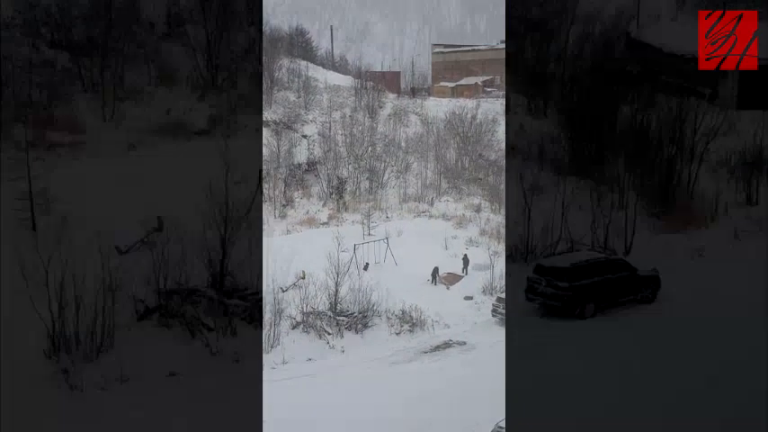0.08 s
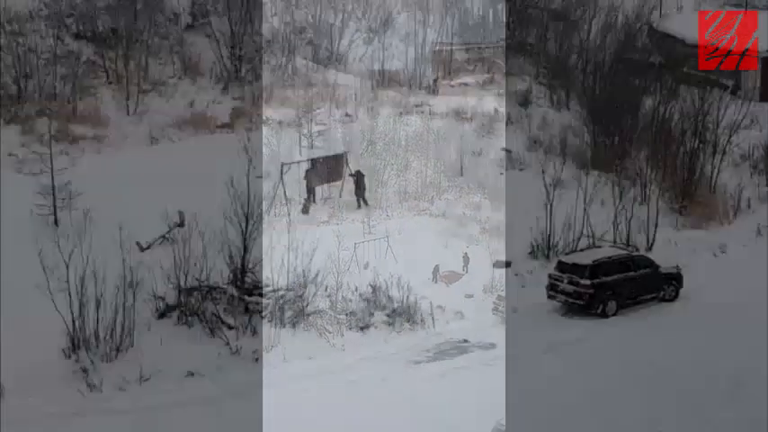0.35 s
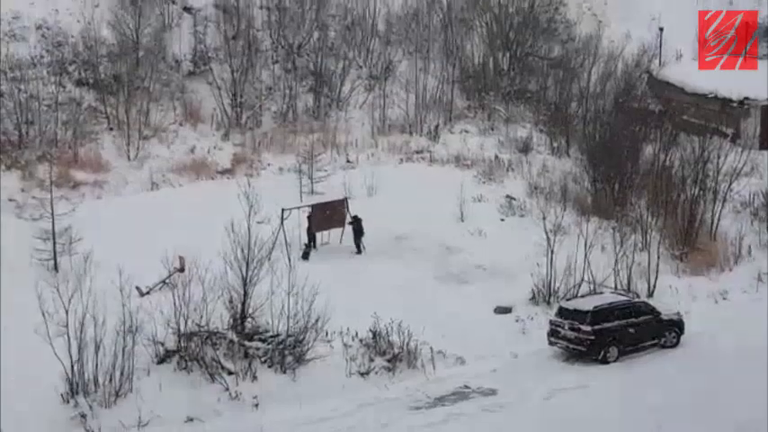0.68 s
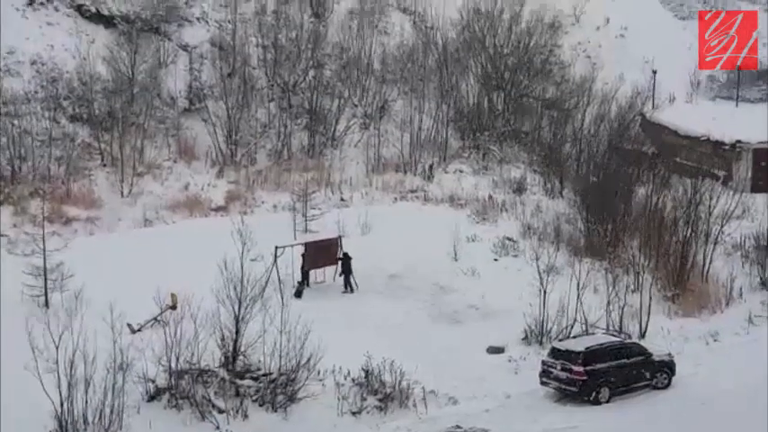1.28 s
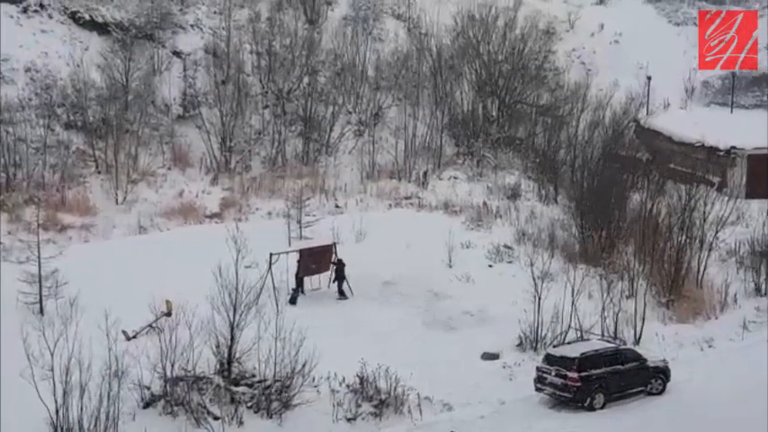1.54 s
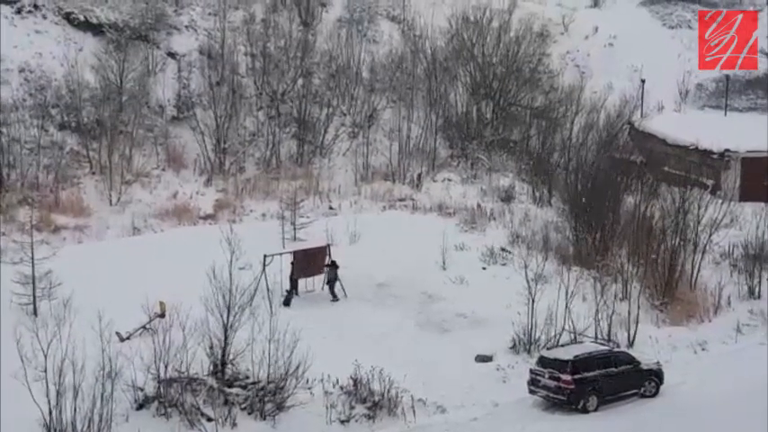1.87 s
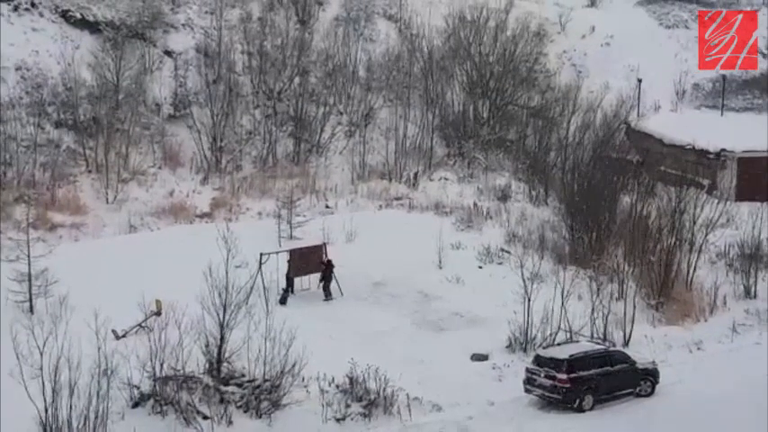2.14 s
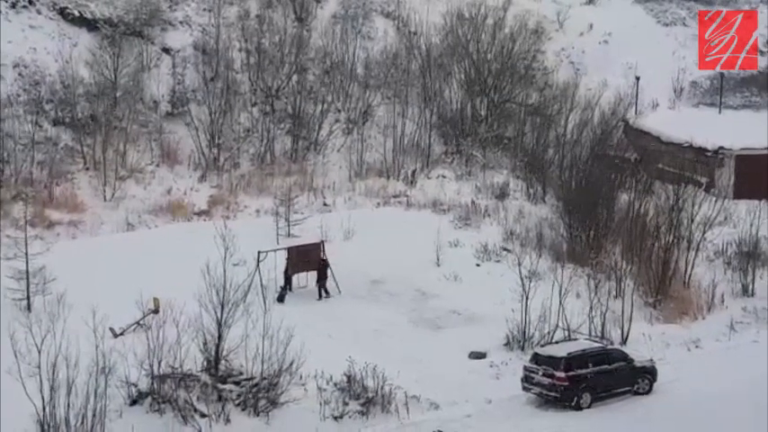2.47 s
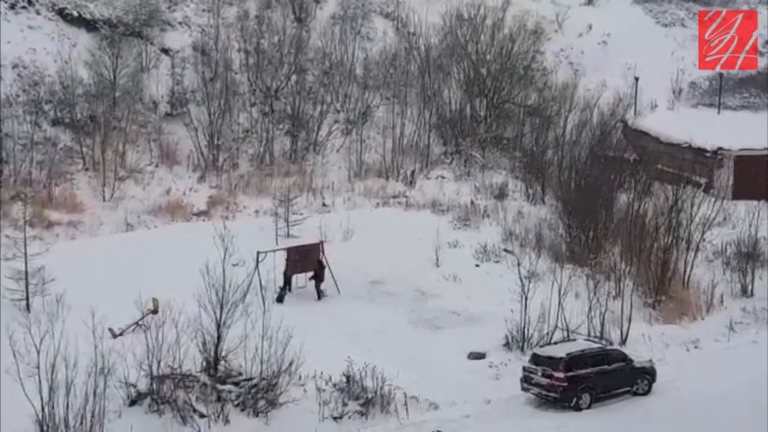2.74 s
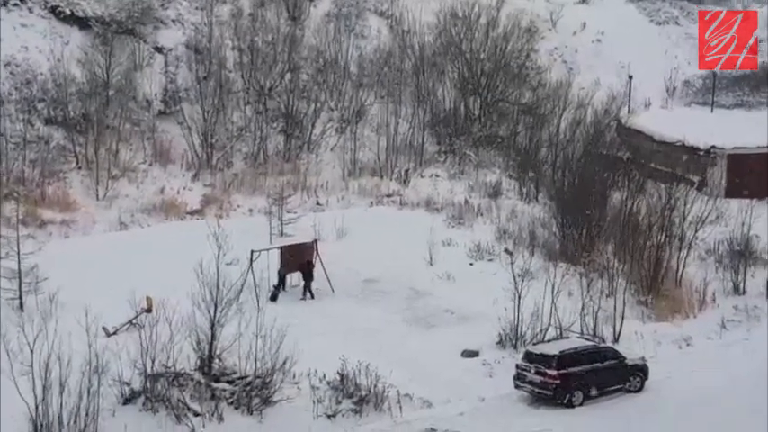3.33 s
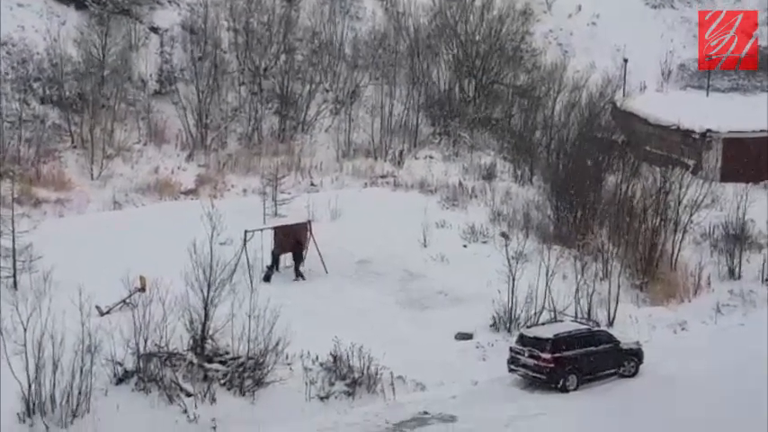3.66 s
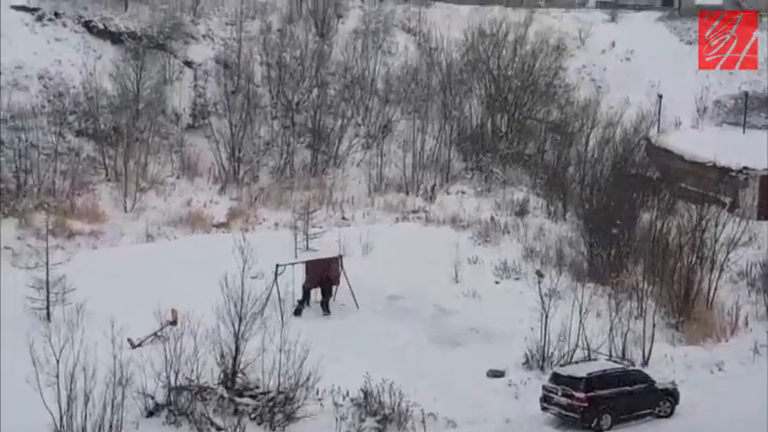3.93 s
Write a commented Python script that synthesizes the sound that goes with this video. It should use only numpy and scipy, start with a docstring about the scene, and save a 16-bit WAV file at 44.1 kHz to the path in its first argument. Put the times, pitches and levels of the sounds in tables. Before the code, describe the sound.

Two people beat a hanging carpet in a snowy yard, heard from a distance. Wind briefly buffets the microphone, then dull, uneven thumps with a short echo grow louder. Small birds twitter faintly throughout.

```python
"""Two people beat a hanging carpet in a snowy yard, heard from a distance and from above.
Each blow is an impulse response: one heavily damped swing radiates a dull pulse with a short crack,
followed by a close reflection and a tail scattered by trees and walls. Faint tones ring far off.
Small birds twitter throughout in frequency-modulated notes. Turbulent wind buffets the microphone
at first, then settles, leaving the broadband noise of the air."""
import sys
import numpy as np
from scipy import signal
from scipy.fft import rfft, irfft
from scipy.io import wavfile

SR = 44100
rng = np.random.default_rng(int(sys.argv[2]) if len(sys.argv) > 2 else 0)


def wav_record(signal):
    """Record a signal, one row per channel, as 16-bit PCM in the file named by sys.argv[1]."""
    frames = np.transpose(np.atleast_2d(signal))
    bounded = np.clip(frames, -1, 1)
    # unit amplitude maps onto the largest positive 16-bit level
    quanta = np.round(bounded * 32767).astype(np.int16)
    wavfile.write(sys.argv[1], SR, quanta)


N = 176400
T = np.arange(N) / SR

# blows on the carpet: (time [s], level [dB], thump pitch [Hz], thump low-pass [Hz], first touch [dB],
# crack [dB], crack low-pass [Hz], tail [dB], reflection delay [s], reflection [dB])
BLOWS = [(0.8873, -31.5, 284, 810, -35, 1, 10600, 1.5, .0034, -2),
         (0.9643, -33.5, 263, 660, -7, -6.5, 2930, -1.5, 0.004, -8),
         (1.3142, -31, 430, 470, -24, 1, 5560, 4, 0.0026, -5),
         (1.6750, -44, 372, 1200, -8, 3.5, 2900, 2.5, 0.004, -2),
         (1.7092, -31, 290, 726, -4, -4, 2820, -4.5, .0041, -21),
         (1.746, -43, 420, 600, -20, -1, 2500, -2, 0.00423, -4),
         (2.1472, -29.5, 305, 1100, -6.5, -8, 2800, 0.5, 0.0041, -8),
         (2.451, -32, 293, 445, -16, -23, 2000, 1, 0.0033, -6),
         (2.6327, -21.5, 444, 1300, -20, -13, 6300, 2.5, .0045, -31),
         (3.0437, -22.5, 480, 1740, -27, -12.5, 3480, 1.5, 0.00404, -5),
         (3.3155, -32.5, 288, 490, -8.5, -5.5, 3000, -0.5, 0.0039, -9),
         (3.4638, -21, 352, 1300, -15, -7.5, 3260, -1, .0038, -9.5),
         (3.9065, -12.5, 435, 1980, -29, -5.5, 2630, 0, 0.0043, -10)]
BLOW_PAN_DB, TOUCH_LEAD_S = 2.4, .0044
PUSH_S, PUSH_DB = .00079, -21  # air pushed ahead of the beater
def carpet():
    """Multipath propagation: each blow arrives directly, by one close reflection and by scattering."""
    out, paths = np.zeros((2, N)), yard_paths()
    for s, db, thump_hz, edge_hz, touch_db, crack_db, top_hz, tail_db, delay, reflection_db in BLOWS:
        pulse = from_db(db) * blow(thump_hz, edge_hz, crack_db, top_hz)
        add(out, s - PUSH_S, from_db(db + PUSH_DB) * np.hanning(int(PUSH_S * SR)))
        add(out, s - TOUCH_LEAD_S, from_db(touch_db) * pulse)
        add(out, s, pulse)
        add(out, s + delay, from_db(reflection_db) * pulse)
        add(out, s, from_db(tail_db) * sum(scatter(pulse, envelope, field) for envelope, field in paths))
    return pan(BLOW_PAN_DB) * out


# resonances of the crack: (frequency [Hz], gain [dB], Q [-])
CRACK_PEAKS = [(5160, 8.5, 20), (8000, 15, 21), (9870, -21, 0.56), (12700, 16, 20)]
# peaks and dips of the path over the snow: (frequency [Hz], gain [dB], Q [-])
SNOW_PATH = [(129, 9, 2.86), (470, 3.5, 3.75), (722, -6, 9), (936, -22, 7.1), (1100, 3, 18.6),
             (1980, -10.5, 1.11), (2520, 2.5, 9.1)]
THUMP_Q, THUMP_LOW_HZ, CRACK_DECAY_S, CRACK_LOW_HZ = .82, 50, .0017, 1300
def blow(thump_hz, edge_hz, crack_db, top_hz):
    """Damped oscillator: the struck carpet swings once while the beater cracks on its pile."""
    t = T[:SR // 20]
    swing = signal.lfilter(*signal.iirpeak(thump_hz, THUMP_Q, fs=SR), -1. * (t == 0))
    swing = cut(cut(swing, edge_hz, "low"), THUMP_LOW_HZ, "high", order=1)
    hiss = coloured(rng.standard_normal(len(t)), CRACK_PEAKS)
    hiss = unit(cut(cut(hiss, CRACK_LOW_HZ, "high"), top_hz, "low", order=4))
    crack = from_db(crack_db) * hiss * np.exp(-t / CRACK_DECAY_S) / 2
    return coloured(swing / np.abs(swing).max() + crack, SNOW_PATH)


# spectrum of the scattered tail: (frequency [Hz], gain [dB])
TAIL_SPECTRUM = [(60, -8), (120, -3), (170, -5), (280, -0.5), (340, 1.5), (435, 1), (530, 0.5), (650, 3),
                 (800, 3), (1000, -2), (2000, 0.5), (5000, -3.5), (8000, -8), (14000, -2)]
# echoes from far walls and trees: (delay [s], spread [s], relative level [dB])
ECHOES = [(0.084, 0.013, -25.5), (0.132, 0.011, -13), (0.337, 0.022, -28.5)]
# slight ringing of the echoes: (frequency [Hz], gain [dB], Q [-])
ECHO_PEAKS = [(417, 5, 18), (630, 7, 6.7), (724, 3.5, 22)]
EARLY_DB, EARLY_T60_S, LATE_DB, LATE_T60_S = -5.5, .08, -6, .72
TAIL_SIDE_DB, TAIL_PATCHY_DB, TREBLE_FROM_HZ, TREBLE_LOSS_DB_PER_S = -10.5, 2, 965, 51
def yard_paths():
    """Reverberation: (envelope, noise field) pairs for the low tail, its briefer treble and echoes."""
    t = T[:SR]
    arrived = t > .0043  # onset of the scatter [s]
    early = energy(arrived * from_db(-60 * t / EARLY_T60_S), EARLY_DB)
    late = energy(arrived * from_db(-60 * t / LATE_T60_S), LATE_DB)
    tail = np.hypot(early, late)
    echoes = sum(energy(np.exp(-((t - delay) / spread) ** 2 / 2), db) for delay, spread, db in ECHOES)
    rms_gain = np.sqrt(np.mean(at_hz(TAIL_SPECTRUM, np.arange(SR // 2)) ** 2))
    field = noise(TAIL_SPECTRUM, [(1, TAIL_SIDE_DB)])
    field = rms_gain * unit(field * from_db(TAIL_PATCHY_DB * drift(60)))
    return [(tail, cut(field, TREBLE_FROM_HZ, "low", order=4)),
            (tail * from_db(-TREBLE_LOSS_DB_PER_S * t), cut(field, TREBLE_FROM_HZ, "high", order=4)),
            (echoes, from_db(-5.5) * coloured(field, ECHO_PEAKS))]


BIRD_WET_DB, BIRD_T60_S, BIRD_SIDE_DB, BIRD_PAN_DB, BIRD_LAG_S = -6, .3, -6.5, -2, .00045
def birds():
    """Scattering by trees blurs the song; coming from one side, it reaches the right channel later."""
    song = chirps() + whistles() + hoarse_calls() + flock()
    blur = energy(from_db(-60 * T[:SR] / BIRD_T60_S), BIRD_WET_DB)
    side = [(1, BIRD_SIDE_DB)]
    far = chatter(side)
    scattered = scatter(song, blur, noise([(1, 0)], side))
    left, right = pan(BIRD_PAN_DB) * (from_db(-2.5) * song + scattered + far)
    return np.array([left, np.interp(T - BIRD_LAG_S, T, right)])


# nearer chirps: (time [s], level [dB], pitch [Hz], length [s])
CHIRPS = [(0.191, -59, 4320, 0.044), (.375, -56.5, 4600, 0.03), (0.476, -52, 4380, 0.043),
          (0.612, -67, 4120, 0.043), (0.772, -59.5, 4400, 0.045), (1.012, -54, 4300, 0.027),
          (1.139, -60.5, 4250, 0.053), (1.266, -55.5, 4200, 0.036), (1.453, -55, 4200, 0.026),
          (1.722, -50, 4840, 0.021), (1.788, -59, 4280, 0.058), (1.876, -53.5, 4540, 0.01),
          (1.96, -57.5, 4320, 0.042), (2.033, -55.5, 4570, 0.058), (2.109, -52, 4234, .04),
          (2.206, -58, 4260, 0.023), (2.375, -57.5, 4460, 0.041), (2.487, -52.5, 4410, 0.045),
          (2.687, -56, 4400, 0.037), (2.776, -54.5, 4115, 0.03), (2.882, -59, 4400, 0.098),
          (3.093, -55, 4325, 0.028), (3.223, -53.5, 4570, 0.05), (3.271, -51.5, 4520, 0.025),
          (3.342, -56.5, 4320, 0.029), (3.468, -56, 4450, 0.028), (3.575, -53.5, 4570, 0.019),
          (3.767, -55.5, 4260, 0.033), (3.846, -51, 4680, 0.0076), (3.879, -47.5, 4680, 0.014)]
FALL_S, FALL_DB, FALL_RATIO, FALL_SLIDE, CHIRP_SLIDE_SPREAD = .04, -5.5, .78, -.19, .06
def chirps():
    """Frequency sweeps: a harsh note leans up or down, then a softer, lower one falls away."""
    slides = CHIRP_SLIDE_SPREAD * rng.standard_normal(len(CHIRPS))
    notes = [(*chirp, slide) for chirp, slide in zip(CHIRPS, slides)]
    falls = [(s + length, db + FALL_DB, hz * FALL_RATIO, min(FALL_S, 2 * length), FALL_SLIDE)
             for s, db, hz, length in CHIRPS]
    return glides(notes + falls, rough=.054)


# thin whistles: (time [s], level [dB], pitch [Hz], length [s], slide [share of pitch])
WHISTLES = [(.28, -74, 6100, 0.032, -.05), (.63, -68, 6050, .05, .04), (1.345, -59.5, 6100, 0.031, 0),
            (2.277, -66, 6750, .017, 0.094), (2.34, -67, 6850, 0.025, -.06),
            (2.565, -57, 5050, 0.038, 0.054), (2.575, -65, 6480, 0.061, -.04),
            (3.175, -70.5, 6600, .025, -0.043), (3.33, -64, 6050, 0.11, -0.028),
            (3.485, -60.5, 6230, 0.054, 0.025)]
def whistles():
    """Shallow frequency modulation leaves these high notes nearly pure."""
    return glides(WHISTLES, rough=.017)


# lower calls further off: (time [s], level [dB], pitch [Hz], length [s], slide [share of pitch])
HOARSE_CALLS = [(.05, -64.5, 2410, 0.16, 0), (.245, -59, 2340, 0.032, 0), (.31, -70.5, 2300, 0.138, 0.0016)]
def hoarse_calls():
    """Deeper random modulation spreads each tone into a hoarse band."""
    return glides(HOARSE_CALLS, rough=.07)


# registers of the flock's short notes: (pitch [Hz], level [dB])
FLOCK_REGISTERS = [(3150, -71.5), (4300, -62.5), (6050, -78)]
FLOCK_PER_S, FLOCK_LENGTH_S = 55, .018  # in each register
SPREAD_DB, SPREAD_OCTAVES, SPREAD_SLIDE = 2.5, .16, .11
def flock():
    """Poisson process: short notes start independently and overlap around each register's pitch."""
    out = np.zeros(N)
    for hz, db in FLOCK_REGISTERS:
        draws = rng.standard_normal((400, 4))
        times = np.cumsum(rng.exponential(1, len(draws))) / FLOCK_PER_S
        notes = [(s, db + SPREAD_DB * loud, hz * 2 ** (SPREAD_OCTAVES * high),
                  FLOCK_LENGTH_S * np.exp(.3 * long), SPREAD_SLIDE * lean)
                 for s, (loud, high, long, lean) in zip(times, draws) if s < N / SR]
        out += glides(notes, rough=.022)
    return out


# spectrum of the far part of the flock: (frequency [Hz], gain [dB])
CHATTER_SPECTRUM = [(1200, -9), (2000, -18.5), (2700, -19), (3400, 1), (4400, 0.5), (5200, -7), (6200, -4),
                    (7000, -25), (9000, -29)]
CHATTER_DB, CHATTER_FLICKER_DB = -69, 5.5
def chatter(side):
    """Incoherent summation: many distant voices merge into a flickering hiss."""
    return from_db(CHATTER_DB + CHATTER_FLICKER_DB * drift(15)) * noise(CHATTER_SPECTRUM, side)


# tones from across the yard: (time [s], level [dB], pitch [Hz], length [s], slide [share of pitch])
FAR_TONES = [(2.7, -55, 630, 0.076, 0.077), (2.94, -64, 764, 0.065, -.02), (2.94, -61, 445, 0.086, -0.036),
             (3.6, -67.5, 644, .13, -0.012)]
def far_tones():
    """Random frequency modulation roughens faint tones between the blows."""
    return pan(BLOW_PAN_DB) * glides(FAR_TONES, rough=.055)


# single buffets: (time [s], peak level [dB], pitch [Hz])
BUFFETS = [(0.0956, -29, 145), (0.543, -41.5, 165), (0.796, -43.5, 56.6), (0.908, -40, 97),
           (1.296, -45, 63)]
# envelope of the rumble: (time [s], level [dB])
WIND_ENVELOPE = [(0, -43.5), (.06, -44.5), (.12, -44.5), (.21, -44), (.3, -53), (.55, -51), (.72, -59.5),
                 (.9, -60.5), (1.1, -77), (1.35, -64), (1.6, -97.5), (4, -90)]
# spectrum of the rumble: (frequency [Hz], gain [dB])
WIND_SPECTRUM = [(20, -17), (45, -0.5), (80, 6.5), (130, 1.5), (220, -8), (400, -20), (900, -45),
                 (2000, -47), (6000, -138)]
WIND_PAN_DB, WIND_SIDE_DB, GUST_DB, GUST_HZ = 5, -6, 2.5, 14
def wind():
    """Turbulence: pressure fluctuations on the microphone make a lumpy rumble and single buffets."""
    buffets = np.zeros(N)
    for s, db, hz in BUFFETS:
        phase = 2 * np.pi * hz * (T - s)
        buffets -= from_db(db) * phase * np.exp((1 - phase ** 2) / 2)
    gusts = from_db(GUST_DB * drift(GUST_HZ) - .5)
    rumble = level(WIND_ENVELOPE) * gusts * noise(WIND_SPECTRUM, [(1, WIND_SIDE_DB)])
    return pan(WIND_PAN_DB) * (rumble + buffets)


# envelope of the rustle: (time [s], level [dB])
RUSTLE_ENVELOPE = [(0, -73), (.083, -71), (.086, -49), (.11, -57.5), (.25, -72), (.52, -71), (.62, -80),
                   (.9, -100)]
# spectrum of the rustle: (frequency [Hz], gain [dB])
RUSTLE_SPECTRUM = [(200, 12), (600, 11), (1150, 6), (1700, 3.5), (2300, 9), (3200, -14), (6000, -42),
                   (14000, -39)]
def rustle():
    """Amplitude-modulated noise: a soft rustle at the start, as wide as the air."""
    return level(RUSTLE_ENVELOPE) * noise(RUSTLE_SPECTRUM, AIR_WIDTH)


# spectrum of the steady air: (frequency [Hz], gain [dB])
AIR_SPECTRUM = [(25, -3.5), (60, 2), (105, 2), (170, -22.5), (450, -19), (900, -25.5), (1600, -24.5),
                (2700, -15), (4400, -13.5), (6200, -21), (7000, -26), (9000, -28.5), (12000, -26),
                (13500, -32), (15500, -37)]
# stereo width of the air: (frequency [Hz], side-to-mid ratio [dB])
AIR_WIDTH = [(40, -3), (400, -18), (1000, -4.5), (2300, -5.5), (4400, -2.5), (8000, -2), (12000, -6)]
AIR_DB, AIR_FLICKER_DB = -63.5, .4
def air():
    """Nearly stationary noise forms the ambient floor of the yard."""
    return from_db(AIR_DB + AIR_FLICKER_DB * drift(8.9)) * noise(AIR_SPECTRUM, AIR_WIDTH)


def glides(notes, rough, arch=.04):
    """Frequency modulation: each tone slides, arches and warbles by shares of its pitch."""
    out, warble = np.zeros(N), drift(388)
    for s, db, hz, length, slide in notes:
        u = np.linspace(-1, 1, int(max(length, .005) * SR))  # position within the note
        jitter = rough * warble.take(int(s * SR) + np.arange(len(u)), mode="wrap")
        pitch = hz * (1 + slide * u - arch * u ** 2 + jitter)
        envelope = from_db(db) * np.sqrt(2 * (1 - u ** 2))
        add(out, s, envelope * np.sin(2 * np.pi * np.cumsum(pitch) / SR))
    return out


def scatter(x, envelope, field):
    """Convolution with a random stretch of enveloped noise gives dense echoes."""
    start = rng.integers(N - len(envelope))
    response = field[:, start:start + len(envelope)] * envelope
    return signal.fftconvolve(x[None], response, axes=1)[:, :N]


def noise(spectrum, width):
    """Spectral shaping of mid and side noise; stereo, rms 1."""
    hz = np.arange(N // 2 + 1) * SR / N
    mid, side = rfft(rng.standard_normal((2, N))) * at_hz(spectrum, hz) * (hz > 15)
    side = side * at_hz(width, hz)
    return unit(irfft([mid + side, mid - side], N))


def drift(hz):
    """Low-passed random fluctuation of rms 1."""
    return unit(cut(rng.standard_normal(N + SR), hz, "low")[SR:])


def coloured(x, peaks):
    """Resonances and antiresonances in cascade."""
    for hz, db, q in peaks:
        x = x + (from_db(db) - 1) * signal.lfilter(*signal.iirpeak(hz, q, fs=SR), x)
    return x


def cut(x, hz, kind, order=2):
    """Butterworth low- or high-pass."""
    return signal.sosfilt(signal.butter(order, hz, kind, fs=SR, output="sos"), x)


def from_db(db):
    """Decibels to amplitude ratio."""
    return 10 ** (np.asarray(db) / 20)


def unit(x):
    """Normalisation to rms 1."""
    return x / np.sqrt(np.mean(x ** 2) + 1e-20)


def energy(envelope, db):
    """Normalisation to a total energy."""
    return from_db(db) * unit(envelope) / np.sqrt(len(envelope))


def at_hz(points, hz):
    """Gain of a dB table interpolated in log frequency."""
    f, db = np.transpose(points)
    return from_db(np.interp(np.log(hz + 1e-3), np.log(f), db))


def level(points):
    """Gain of a dB table interpolated in time."""
    return from_db(np.interp(T, *np.transpose(points)))


def pan(db):
    """Left and right gains for a level difference."""
    return from_db(np.array([[db], [-db]]) / 2)


def add(track, s, x):
    """Superpose a short sound at time s."""
    i = int(np.clip(s * SR, 0, N - 1))
    track[..., i:i + x.shape[-1]] += x[..., :N - i]


def scene():
    """Superposition: the pressures of all sources add."""
    return carpet() + far_tones() + birds() + wind() + rustle() + air()


CUTOFF_HZ = 15700
def record(dry):
    """Band limiting: a steep elliptic low-pass removes the highest treble."""
    return signal.sosfilt(signal.ellip(10, .1, 70, CUTOFF_HZ, fs=SR, output="sos"), dry)


dry = scene()
out = record(dry)
wav_record(out)
```